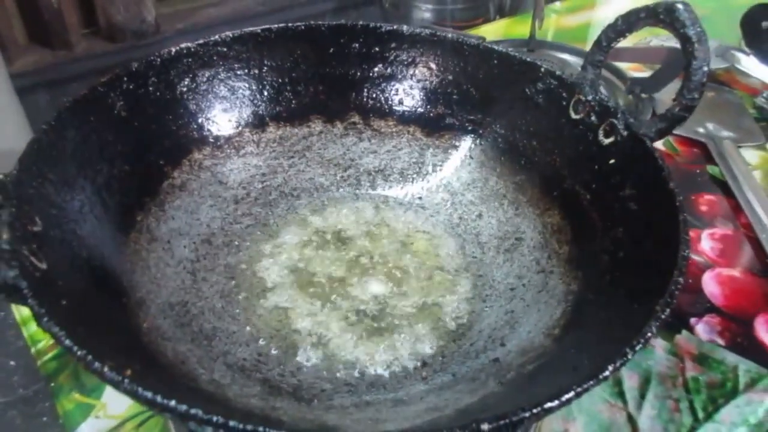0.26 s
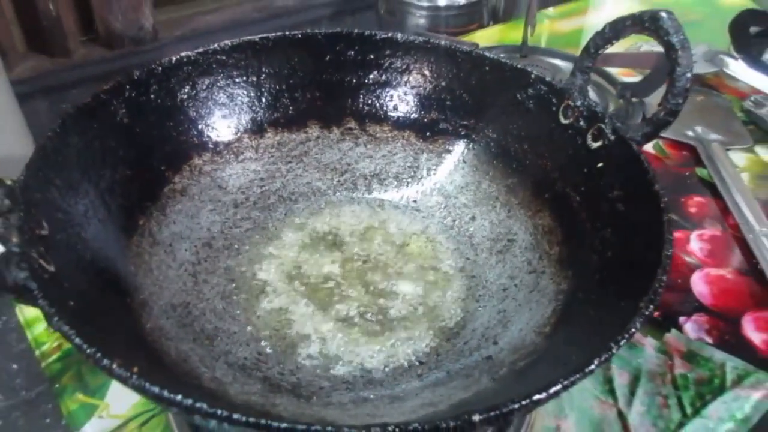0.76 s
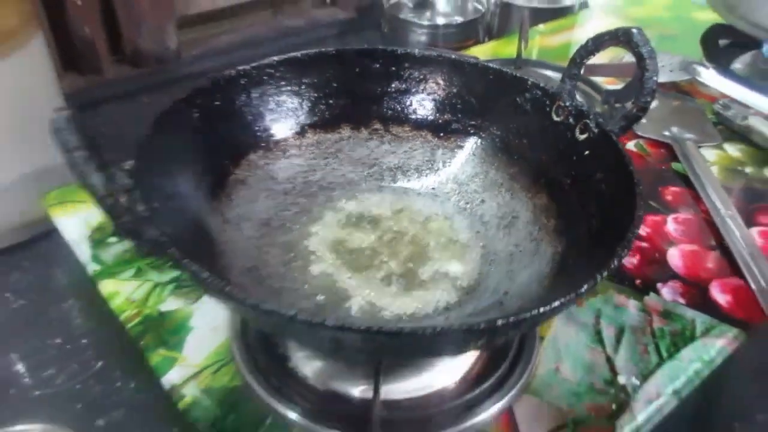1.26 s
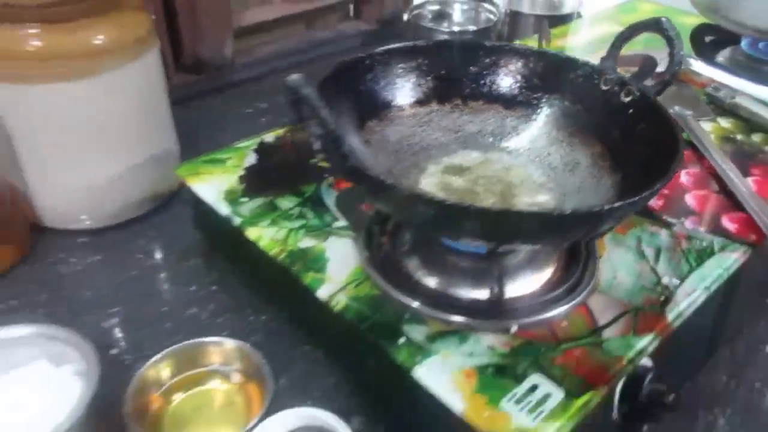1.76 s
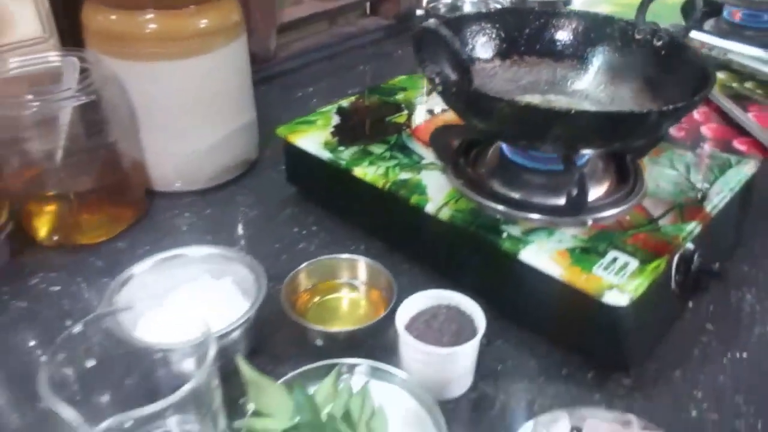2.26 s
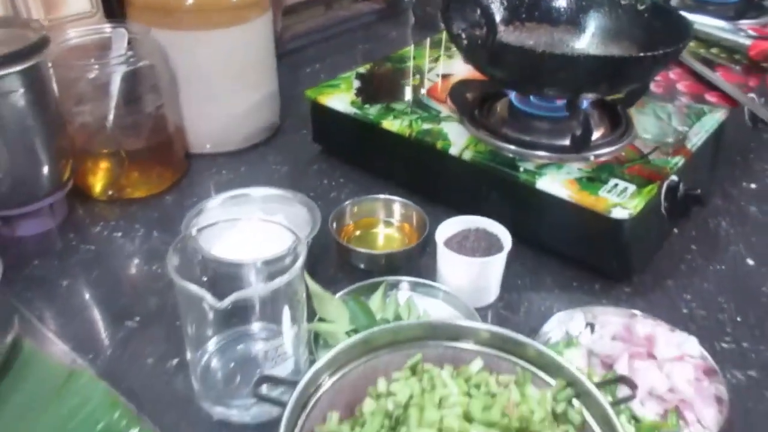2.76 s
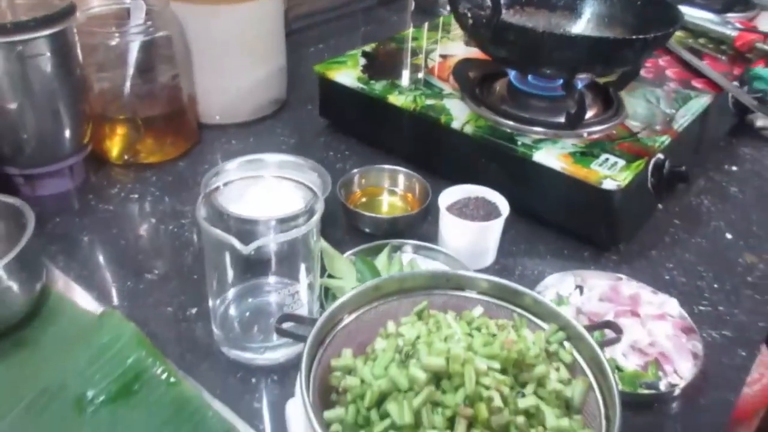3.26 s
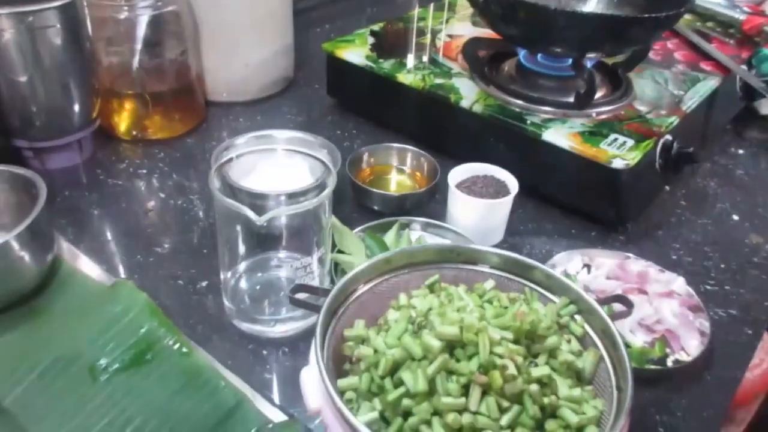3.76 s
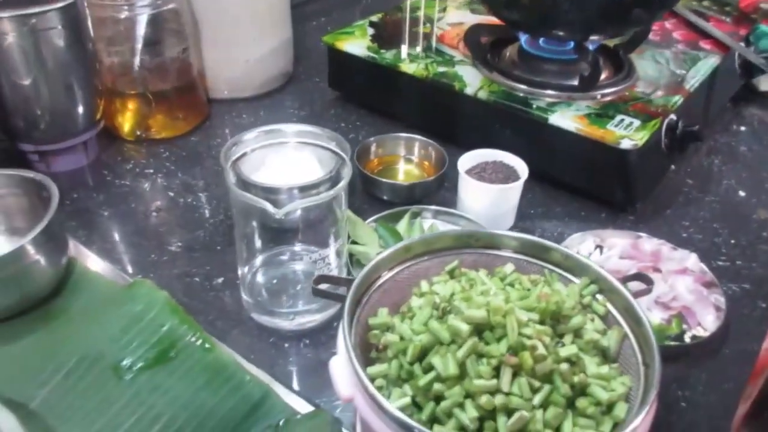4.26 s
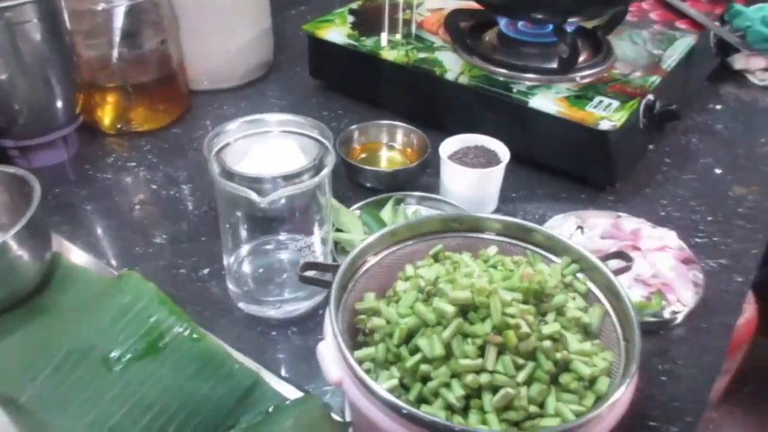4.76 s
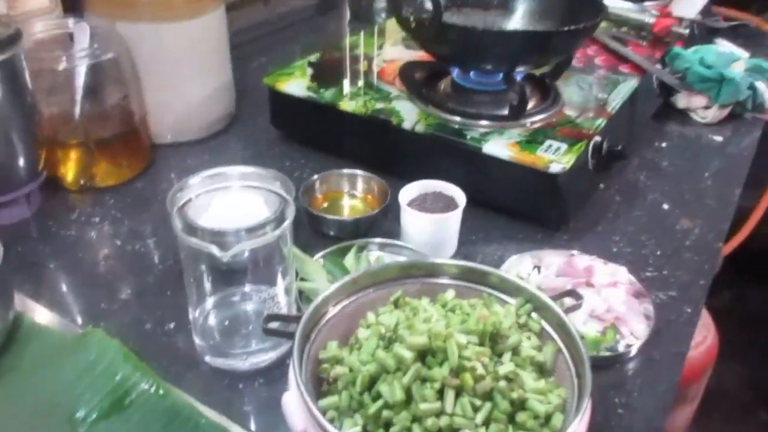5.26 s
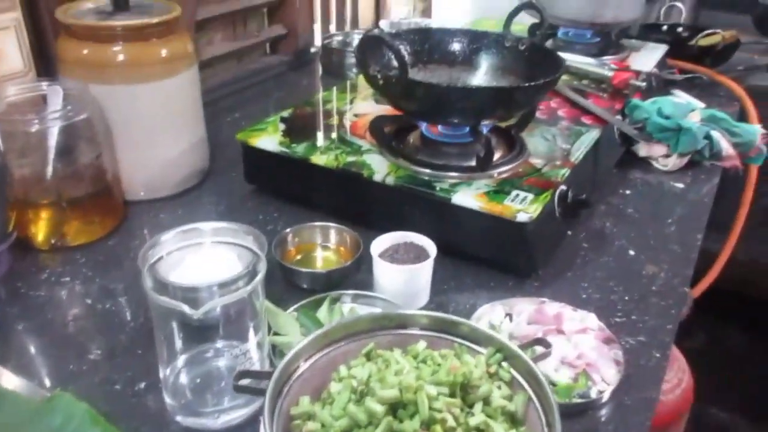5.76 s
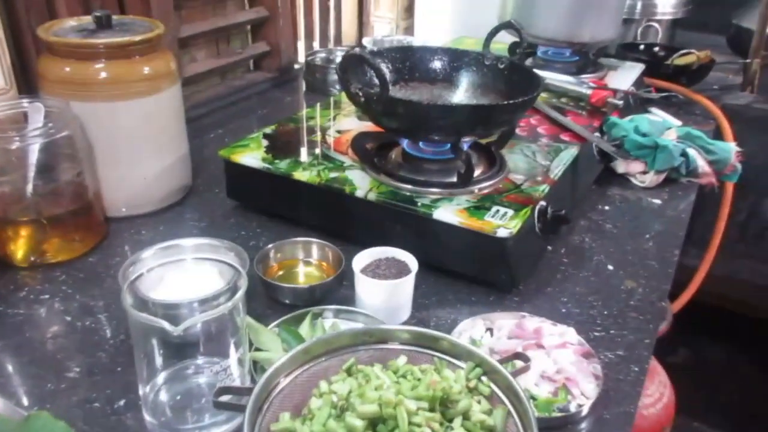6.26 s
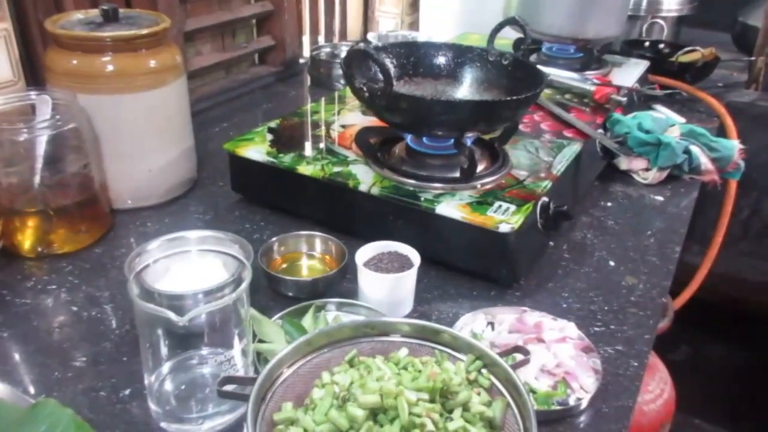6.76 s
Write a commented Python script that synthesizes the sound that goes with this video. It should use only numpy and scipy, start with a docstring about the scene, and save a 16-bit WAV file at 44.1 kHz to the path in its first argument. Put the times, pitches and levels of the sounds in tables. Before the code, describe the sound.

Mustard seeds snap sharply in hot oil, then the pan builds into thick, bubbling crackle and splutter in a small hard-walled kitchen.

```python
"""Mustard seeds pop in hot oil in an iron pan on a gas burner, in a small hard-walled kitchen.
At first dry, damped snaps stand out over the burner's shaped noise and faint wavering drones; the hardest,
near 0.3 and 1 s, overload the microphone and press its gain down for a moment. From 1 to 3.3 s it backs away,
so the echoes take over; foam hisses softly near 2.6 s. After a short lull at 3.4 s the crackle surges at 4 s
and stays thick to the end, with many bubbles that burst as briefly ringing cavities."""
import sys
import numpy as np
from scipy import signal
from scipy.fft import rfft, irfft
from scipy.io import wavfile

SR = 44100
rng = np.random.default_rng(int(sys.argv[2]) if len(sys.argv) > 2 else 0)


def wav_record(signal):
    """Record a signal, one row per channel, as 16-bit PCM in the file named by sys.argv[1]."""
    frames = np.transpose(np.atleast_2d(signal))
    bounded = np.clip(frames, -1, 1)
    # unit amplitude maps onto the largest positive 16-bit level
    quanta = np.round(bounded * 32767).astype(np.int16)
    wavfile.write(sys.argv[1], SR, quanta)


N = 309582
TIME = np.arange(N) / SR  # seconds
EDGE_HZ = 15200  # upper band limit
CEILING = 1.1  # amplitude at which the microphone clips

# spectrum of burner and room noise: frequency_hz, relative_density_db_per_hz
RUSH_SPECTRUM = [(20, -19), (34, 7.5), (48, -12), (110, -0.5), (170, -1.5), (260, -6.5), (400, -12),
                 (850, -10), (1500, -14), (3000, -15.5), (9000, -16), (11200, -14), (13000, -19.5),
                 (15000, -26)]
# level of that rush before its flutter: time_s, level_db
RUSH_LEVEL = [(0, -45.5), (1.2, -42.5), (2.0, -47.5), (4.8, -46.5), (5.8, -43.5), (7.0, -47)]
# faint far-off drones, level before fading in and out: start_s, end_s, pitch_hz, level_db
FAR_DRONES = [(0, 1.8, 215, -57), (.48, .82, 215, -53), (0, 7.2, 64.3, -57), (1.9, 5.6, 69.2, -57),
              (2.2, 5.9, 172, -54), (3.15, 4.5, 145, -54), (5.65, 7.4, 146, -51.5), (4.4, 7.4, 307, -62),
              (4.66, 4.91, 930, -53), (4.6, 4.8, 615, -59), (.45, .62, 490, -63), (.08, .34, 660, -62)]
# spectrum of the low simmering hiss: frequency_hz, relative_density_db_per_hz
SIMMER_SPECTRUM = [(90, 1), (200, 3), (400, -1.5), (850, 0), (1400, -10), (3000, -14.5)]
# level of the simmering hiss: time_s, level_db
SIMMER_CURVE = [(0, -57), (.9, -52.5), (1.7, -56), (2.4, -52.5), (3.2, -58), (3.85, -48.5), (4.5, -56),
                (4.72, -46), (5.1, -51), (7.0, -50)]
# kitchen echo: frequency_hz, relative_colour_db, t60_s
KITCHEN_ECHO = [(444, 15.5, 0.28), (1290, 2, 0.29), (3020, 1.5, 0.33), (7700, 3, 0.27), (15200, 2.5, 0.2)]
# the microphone backs away from the pan: time_s, room_over_direct_db
ROOM_OVER_DIRECT = [(1.0, -13), (2.1, -6.5), (3.3, 0.5), (6.5, 0)]
# how hard the oil splutters: time_s, level_db (each swarm adds its own offset)
SPLUTTER_LEVEL = [(0, -46.5), (.45, -46.5), (1.2, -43.5), (2.3, -41.5), (3.25, -41.5), (3.42, -47.5),
                  (4.03, -32), (4.17, -43), (4.63, -37.5), (4.82, -40.5), (5.2, -35.5), (5.42, -37),
                  (5.64, -36), (6.2, -34.5), (6.56, -38), (7.0, -38.5)]
# the loudest bursting steam bubbles: start_s, level_db (over a millisecond), pitch_hz
BUBBLE_BURSTS = [(0.053, -24.5, 5400), (1.167, -22.5, 3700), (1.2648, -19, 6300), (1.3542, -22, 3500),
                 (1.782, -20, 1840), (1.937, -25, 2140), (1.968, -23, 3150), (2.3466, -19.5, 2310),
                 (2.497, -29, 2470), (2.504, -22.5, 2060), (3.317, -25, 3130), (3.477, -22.5, 2940),
                 (3.851, -23, 2970), (4.0556, -20, 3260), (4.222, -16, 3070), (4.3656, -18.5, 2530),
                 (4.3915, -18.5, 2580), (4.624, -21, 3220), (4.6743, -16.5, 2890), (4.831, -24, 3000),
                 (4.9403, -15.5, 2540), (5.0622, -17, 3020), (5.0846, -18, 3080), (5.3336, -17.5, 3200),
                 (5.4543, -18.5, 9100), (5.472, -11.5, 1500), (5.615, -13.5, 2200), (5.6179, -13, 2770),
                 (5.705, -16.5, 2760), (5.752, -13.5, 2260), (5.896, -15.5, 3000), (5.956, -11, 2380),
                 (6.018, -11.5, 2570), (6.0657, -15, 3080), (6.1264, -15, 3260), (6.2067, -15.5, 2450),
                 (6.2899, -18, 2800), (6.3078, -22, 3240), (6.4141, -16.5, 3380), (6.4448, -15.5, 3150),
                 (6.6235, -17.5, 3020), (6.6521, -13.5, 2480), (6.6947, -13, 2650), (7.0104, -15, 3220)]
# the loudest cracking seed coats: start_s, level_db (over a millisecond), pitch_hz, decay_cycles (to 1/e)
SEED_SNAPS = [(0.1965, -19.5, 2320, 0.54), (0.2313, -26.5, 6300, 1.5), (0.2423, -24, 11000, 0.44),
              (0.3274, -2, 11000, 0.38), (0.5045, -13.5, 11000, .13), (0.572, -23, 2270, 0.52),
              (0.5803, -15, 9600, 0.42), (0.719, -15.5, 4350, 1.1), (0.756, -16.5, 6400, 1.6),
              (0.829, -13.5, 4030, 0.38), (0.8866, -7, 4670, 0.58), (0.9648, -18.5, 3170, 0.7),
              (1.0065, -0.5, 10000, 0.6), (1.0812, -18, 9100, 0.41), (1.477, -9, 3150, 1),
              (1.4967, -17, 8900, 0.61), (1.6083, -15, 3440, 0.43), (1.6343, -16, 9400, 0.78),
              (1.7534, -6.5, 9600, 0.48), (1.783, -21, 6500, .6), (1.8595, -18, 11000, 0.25),
              (1.9673, -13, 3200, 0.76), (2.1756, -17, 3340, 0.53), (2.232, -21.5, 3380, .7),
              (2.3258, -16, 8500, 0.97), (2.5674, -20, 3630, 0.42), (2.7157, -15, 3860, 0.37),
              (2.7786, -22, 6030, 0.56), (2.8442, -26, 7300, 0.34), (3.0332, -19, 2670, 0.93),
              (3.103, -21.5, 6460, 0.39), (3.1636, -16.5, 2910, 1.24), (3.2317, -24, 5700, 1.2),
              (3.275, -22, 4300, 0.53), (3.4904, -17.5, 5840, 0.44), (3.633, -11.5, 5370, .36),
              (3.701, -24, 3140, 0.52), (3.8765, -22, 3530, 0.65), (3.939, -18.5, 5790, 0.26),
              (3.973, -19, 2560, 0.48), (3.985, -18.5, 4970, 0.43), (4.031, -22, 7000, 0.75),
              (4.0874, -13.5, 7200, 0.41), (4.2486, -19, 3630, 0.83), (4.27, -17.5, 5330, 0.32),
              (4.4655, -17.5, 3950, 0.59), (4.5501, -17, 2750, 0.81), (4.5883, -15.5, 3560, 0.62),
              (4.6119, -16, 5650, 0.4), (4.7393, -20, 4400, 1.5), (4.894, -20, 5100, 0.25),
              (4.916, -24, 6500, 0.99), (4.9319, -21, 6900, 0.65), (5.011, -19, 4600, 1.2),
              (5.1597, -18, 5570, 0.64), (5.22, -16.5, 4660, 0.5), (5.2355, -13, 2780, 0.8),
              (5.2516, -17, 5790, 0.15), (5.3215, -16, 4130, 0.1), (5.5385, -18.5, 3460, .84),
              (5.5604, -14, 3000, 0.54), (5.663, -15, 3900, 0.24), (5.7707, -16.5, 8100, 0.27),
              (5.8594, -15, 5540, 0.36), (5.9742, -14, 3780, 0.13), (6.015, -15, 7100, 0.42),
              (6.043, -22.5, 4200, 0.56), (6.0827, -18.5, 5100, 0.35), (6.221, -15, 6770, 0.93),
              (6.237, -12.5, 2760, 0.67), (6.2727, -18.5, 5900, 1.2), (6.3425, -20, 8240, 0.34),
              (6.4319, -10.5, 3770, 0.19), (6.4837, -8, 7200, 0.42), (6.692, -16, 5750, 1.2),
              (6.7731, -17.5, 4120, 0.5), (6.9734, -18, 3370, 1.2)]


def gain_of(db):
    """Level: twenty decibels are a factor of ten in amplitude."""
    return 10 ** (np.asarray(db) / 20)


def evened(x):
    """Normalisation: scales a signal to rms 1."""
    return x / np.sqrt(np.mean(x ** 2) + 1e-20)


def curve(rows, s):
    """Linear interpolation: reads a curve at the times s."""
    return np.interp(s, *np.transpose(rows))


def read(rows, hz, axis=1):
    """Logarithmic pitch scale: reads one column of a spectrum along log frequency."""
    columns = np.transpose(rows)
    return np.interp(np.log(hz + 1), np.log(columns[0]), columns[axis])


def add(mix, s, sound):
    """Superposition: adds a sound into the mix at time s."""
    part = mix[max(round(s * SR), 0):][:len(sound)]
    part += sound[:len(part)]


def drift(rate_hz, size=2048):
    """Random modulation: low-passed noise of rms 1."""
    hz = np.fft.rfftfreq(size, N / SR / size)
    slow = irfft(rfft(rng.standard_normal(size)) / (1 + (hz / rate_hz) ** 4))
    return evened(np.interp(np.arange(N) * size / N, np.arange(size), slow))


def shaped_noise(spectrum):
    """Spectral shaping: white noise weighted by a spectrum, at rms 1."""
    weight = gain_of(read(spectrum, np.fft.rfftfreq(N, 1 / SR)))
    return evened(irfft(rfft(rng.standard_normal(N)) * weight, N))


def bandpass(x, order, low_hz, high_hz):
    """Band limitation: Butterworth filter along the last axis."""
    sos = signal.butter(order, [low_hz, high_hz], "bandpass", fs=SR, output="sos")
    return signal.sosfilt(sos, x)


def burner(flutter_db=1):
    """Broadband flow noise: the soft rush of flame and room, with a slow random flutter."""
    level_db = curve(RUSH_LEVEL, TIME) + flutter_db * drift(0.88)
    return gain_of(level_db) * shaped_noise(RUSH_SPECTRUM)


def drones(waver_db=2, wander=0.0081):
    """Modulated sinusoids: far-off tones swell, waver in pitch and level, and fade."""
    out = np.zeros(N)
    for start_s, end_s, pitch_hz, level_db in FAR_DRONES:
        cycles = np.cumsum(pitch_hz * (1 + wander * drift(13.6))) / SR
        tone = np.sin(2 * np.pi * cycles) * gain_of(waver_db * drift(3.3))
        tone = evened(tone[:max(int((end_s - start_s) * SR), 2)])
        add(out, start_s, gain_of(level_db) * tone * signal.windows.tukey(len(tone), .25))
    return out


def simmer():
    """Continuous boiling noise: a low hiss of varying level fills the gaps between the pops."""
    return gain_of(curve(SIMMER_CURVE, TIME)) * shaped_noise(SIMMER_SPECTRUM)


def kitchen(x, first_s=0.00029, build_s=0.0034, dense_s=.07, count=10):
    """Reverberation: echoes off worktop and walls, sparse at first, then dense, decaying by frequency."""
    delay = np.arange(SR // 3) / SR
    density = np.clip((delay / dense_s) ** 2, .02, 1)
    present = rng.random((count, len(delay))) < density
    tails = rng.standard_normal((count, len(delay))) * present / np.sqrt(density)
    tails *= 1 - np.exp(-np.maximum(delay - first_s, 0) / build_s * 2)
    hz, t, bands = signal.stft(tails, SR, nperseg=256)
    colour_db = read(KITCHEN_ECHO, hz)[:, None]
    t60_s = read(KITCHEN_ECHO, hz, axis=2)[:, None]
    tails = signal.istft(bands * gain_of(colour_db - 60 * t / t60_s), SR, nperseg=256)[1]
    tails /= np.linalg.norm(tails, axis=1, keepdims=True)
    # the sound is handed round the sets of echoes, 17 a second, at constant power
    turn = (17 * TIME - np.arange(count)[:, None]) % count
    share = np.sin(np.pi / 2 * np.minimum(turn, 2))
    return signal.oaconvolve(x * share, tails, axes=1).sum(0)[:N]


def froth(at_s=2.56, width_s=0.28, level_db=-47, low_hz=4500, high_hz=10000):
    """Foam collapse: a patch gives a short, soft band of noise under a Gaussian envelope."""
    hiss = bandpass(rng.standard_normal(N), 2, low_hz, high_hz)
    return gain_of(level_db) * evened(hiss) * np.exp(-((TIME - at_s) / width_s) ** 2)


def bursts(pitch_hz, cycles, snap=0.17, hold=1.52, round_cycles=3.9, low_hz=1250,
           wall_db=-6, wall_s=0.0021, sag=0.064, sag_s=0.0021, size=512):
    """Damped oscillation: a skin snaps, its cavity rings and collapses, the pan's wall scatters the sound."""
    t = np.arange(size) / SR
    cycles = cycles[:, None]
    # the pitch sags as it rings
    turns = pitch_hz[:, None] * (t + sag * (sag_s * (1 - np.exp(-t / sag_s)) - t / 2))
    # long-ringing bubbles start gently
    soft = cycles ** 2 / (cycles ** 2 + round_cycles ** 2)
    decay = np.exp(-(turns / np.maximum(cycles, .1)) ** hold)
    ring = np.cos(2 * np.pi * turns - np.pi / 2 * soft) * decay
    ring[:, 0] *= .5 + snap
    wall = rng.standard_normal(ring.shape) * np.exp(-t / wall_s) * (t > .0003)
    wall *= gain_of(wall_db) / np.linalg.norm(wall, axis=1, keepdims=True)
    wall[:, 0] = 1  # the direct path
    sound = signal.fftconvolve(ring, wall, axes=1)
    sound = bandpass(sound, 3, low_hz, EDGE_HZ)  # so small a source radiates little bass
    # equal energy: rms 1 when averaged over a millisecond
    return sound / np.sqrt((sound ** 2).sum(1, keepdims=True) * 1000 / SR)


def play(s, db, pitch_hz, cycles):
    """Superposition in time: lays out a set of bursts."""
    out = np.zeros(N)
    for at, size, sound in zip(s, gain_of(db), bursts(pitch_hz, cycles)):
        add(out, at, size * sound)
    return out


def crackle(per_s, level_db, spread_db, centre_hz, octaves, cycles, thicken=.7, count=48):
    """Random point process: small bursts of random size and pitch, louder and denser with the splutter."""
    pitch_hz = np.minimum(centre_hz * 2 ** (octaves * np.linspace(-1, 1, count)), EDGE_HZ)
    shapes = bursts(pitch_hz, cycles * (.5 + rng.random(count)))
    when, size, shape, chance = rng.random((8000, 4)).T
    s = when * N / SR
    splutter_db = curve(SPLUTTER_LEVEL, s)
    db = level_db + splutter_db + spread_db * np.minimum(-np.log(size), 3)
    rate = per_s * gain_of(thicken * (splutter_db - splutter_db.mean()))
    out = np.zeros(N)
    # candidates are thinned to the wanted rate
    for k in np.flatnonzero(chance < rate * N / SR / len(s)):
        add(out, s[k], gain_of(db[k]) * shapes[int(shape[k] * count)])
    return out


def spatter(delay_s=.016, weaker_db=-6.5, range_db=8, most_db=-16, pitch_hz=4300, octaves=1.0,
            cycles=1.55, count=2):
    """Triggered events: each listed burst sets off weaker ones in the oil after exponential waits."""
    parents = [row[:2] for row in SEED_SNAPS + BUBBLE_BURSTS]
    s, db = np.repeat(parents, count, axis=0).T
    wait, size, pitch, ring = rng.random((len(s), 4)).T
    db = np.minimum(db, most_db) + weaker_db - range_db * size
    pitches_hz = pitch_hz * 2 ** (octaves * (2 * pitch - 1))
    return play(s - delay_s * np.log(wait), db, pitches_hz, cycles * (.5 + ring))


def bubbles(ring_cycles=2.55, ring_at_db=-17, db_per_halving=6):
    """Cavity resonance: gentle steam bubbles ring as round plips, violent ones tear and are cut short."""
    s, db, pitch_hz = np.transpose(BUBBLE_BURSTS)
    return play(s, db, pitch_hz, ring_cycles * 2 ** ((ring_at_db - db) / db_per_halving))


def seeds():
    """Impulsive fracture: seed coats crack open with dry, strongly damped snaps."""
    return play(*np.transpose(SEED_SNAPS))


def scene():
    """Superposition: pan, room and background, alike in both channels."""
    plips = crackle(per_s=42, level_db=0.5, spread_db=4.0, centre_hz=2814, octaves=0.66, cycles=2.34)
    ticks = crackle(per_s=60, level_db=-2.0, spread_db=4.5, centre_hz=5850, octaves=0.75, cycles=1.0)
    fizz = crackle(per_s=580, level_db=-21.5, spread_db=1.5, centre_hz=6000, octaves=2.3, cycles=0.13)
    pan = froth() + fizz + ticks + plips + spatter() + bubbles() + seeds()
    room = kitchen(pan * gain_of(curve(ROOM_OVER_DIRECT, TIME)))
    mono = burner() + drones() + simmer() + room + pan
    return np.array([mono, mono])


def held(db, fall_db_per_s):
    """Peak holding: keeps each peak of a level and lets it sink at a steady rate."""
    return np.maximum.accumulate(db + fall_db_per_s * TIME) - fall_db_per_s * TIME


def record(dry, threshold_db=3, recover_db_per_s=4.5, overshoot=1.04, release_db_per_s=80,
           thump=0.86, thump_low_hz=220, thump_high_hz=2600):
    """Overload: the sharpest snaps duck the gain and clip with a thump; a low-pass then limits the band."""
    peak = np.abs(dry).max(0)
    over_db = np.maximum(20 * np.log10(peak + 1e-9) - threshold_db, 0)
    # the gain dives deep for an instant, then creeps back
    slow_db = held(over_db, recover_db_per_s)
    fast_db = held(overshoot * over_db, release_db_per_s)
    duck_db = signal.lfilter(np.ones(20) / 20, 1, np.maximum(slow_db, fast_db))
    ducked = dry / gain_of(duck_db)
    # the overload is lopsided: what exceeds the ceiling leaves a low push
    clipped = np.clip(ducked, -CEILING, CEILING)
    push = bandpass(np.abs(ducked - clipped), 1, thump_low_hz, thump_high_hz)
    lowpass = signal.firwin(255, EDGE_HZ, window=("kaiser", 8), fs=SR)
    return signal.oaconvolve(clipped + thump * push, lowpass[None], "same", axes=1)


dry = scene()
out = record(dry)
wav_record(out)
```